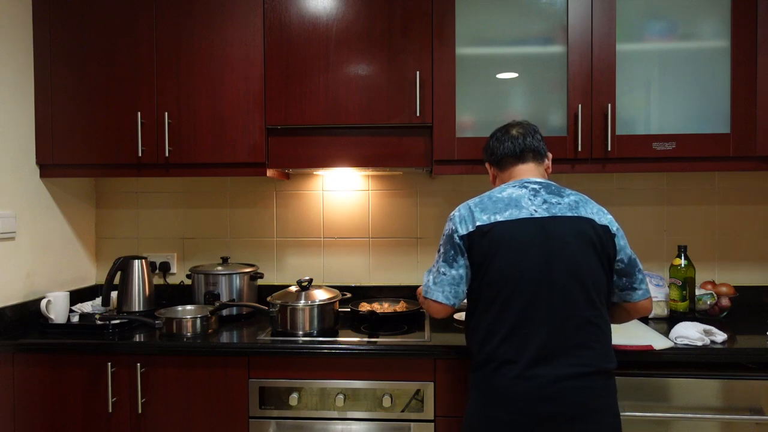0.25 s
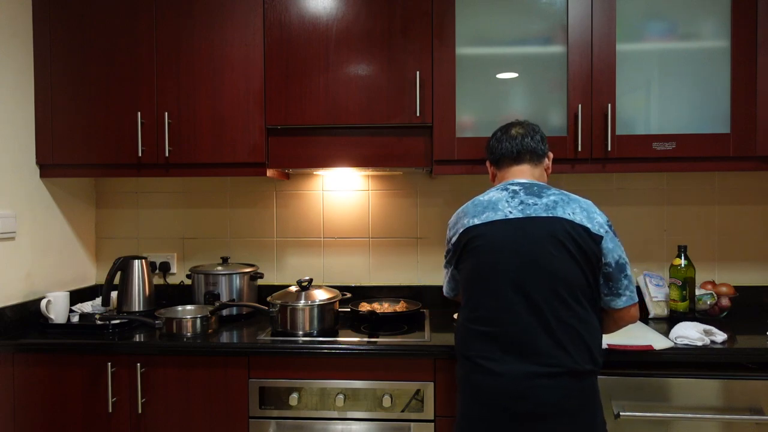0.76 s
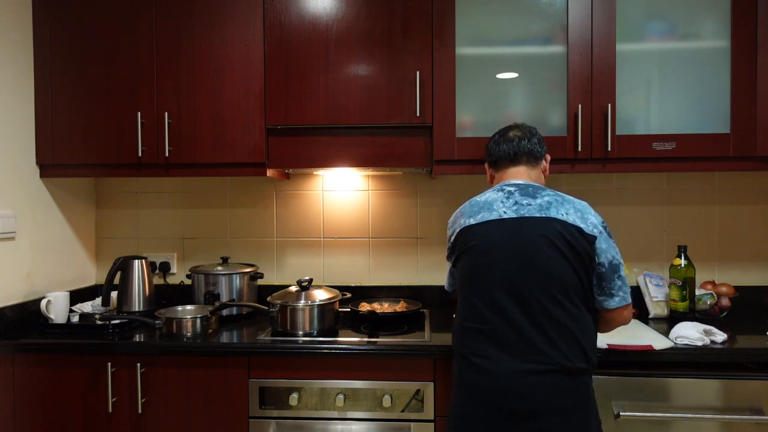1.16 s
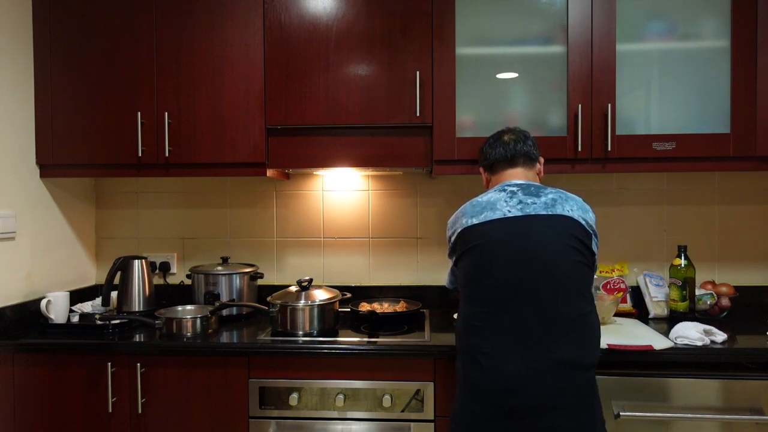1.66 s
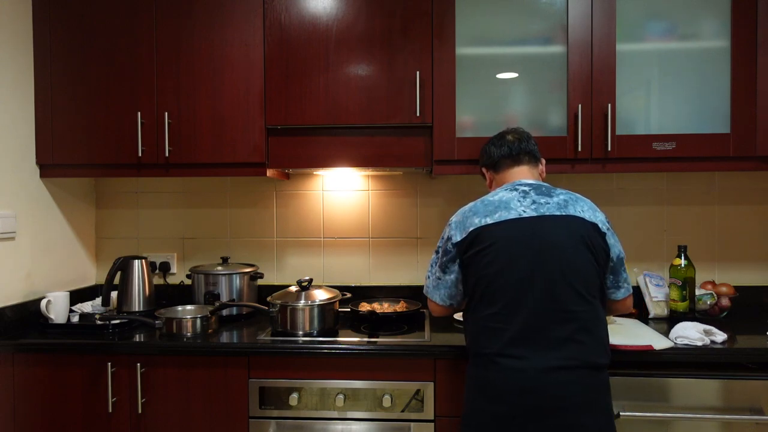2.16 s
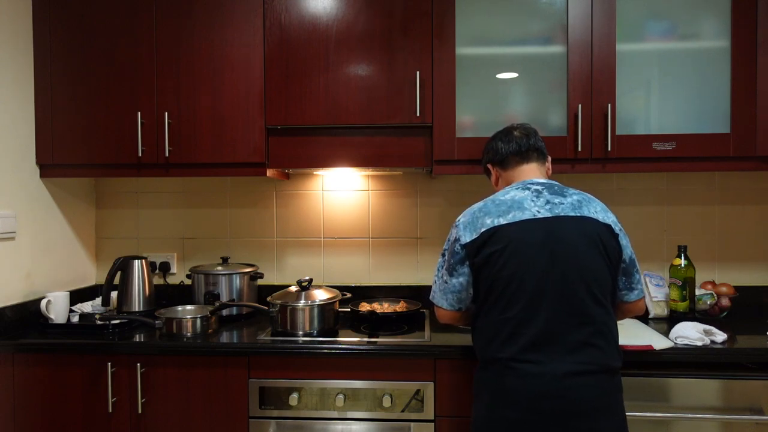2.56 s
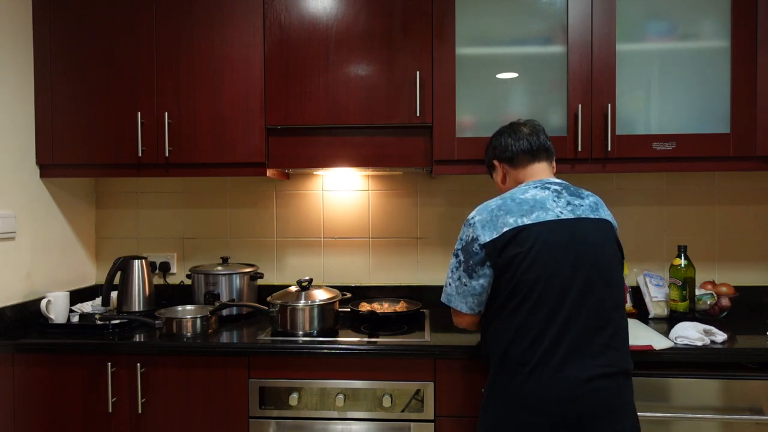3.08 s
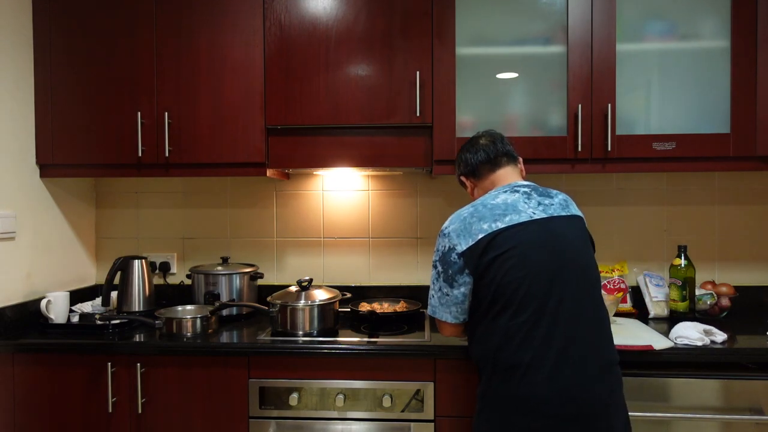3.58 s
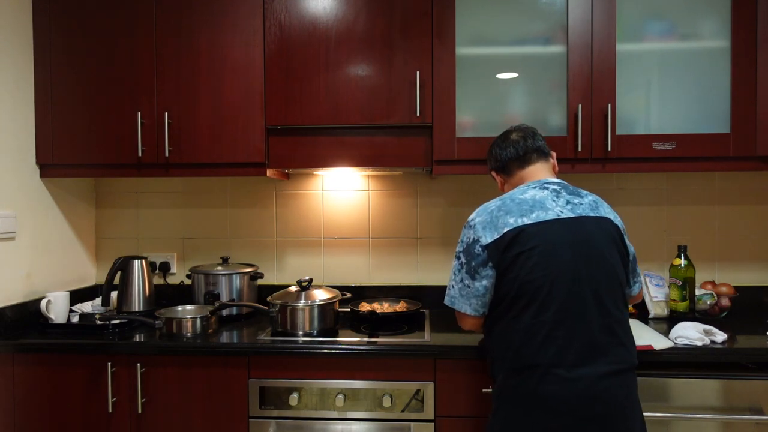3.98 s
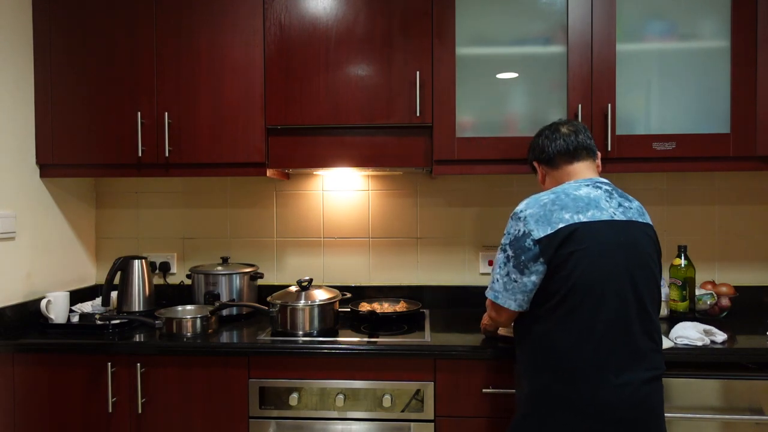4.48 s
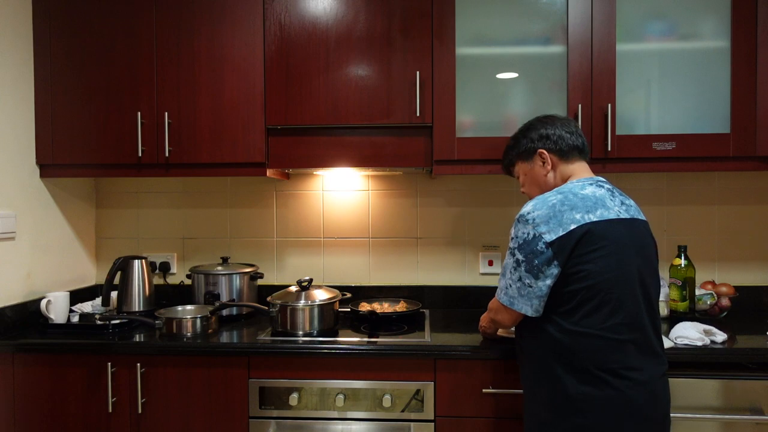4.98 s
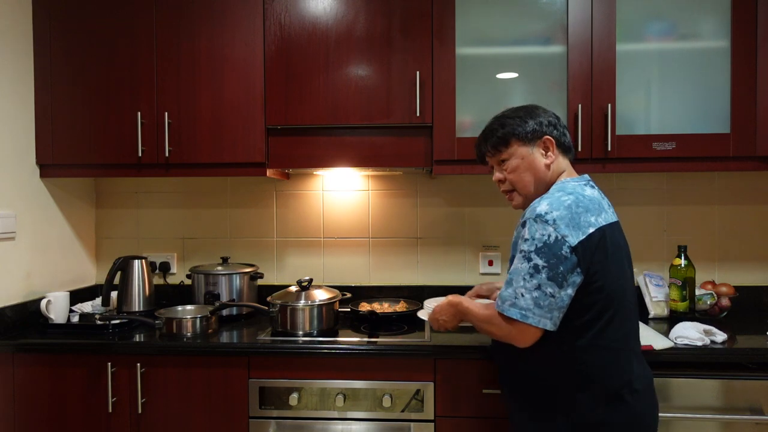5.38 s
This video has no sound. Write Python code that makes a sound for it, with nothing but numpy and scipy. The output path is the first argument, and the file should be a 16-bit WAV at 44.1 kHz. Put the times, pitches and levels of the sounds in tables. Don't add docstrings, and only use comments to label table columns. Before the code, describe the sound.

A barely audible dying metallic ring opens over very faint frying hiss, room air and low hum, with tiny fat spits around 0.5 s. At 0.73 and 0.82 s a lid is struck twice, then a pot lands hard at 0.9, is knocked at 1.0 and settles at 1.1. A pan bangs down at 1.24 and a lid claps shut at 1.33, ringing brightly. A woody-metallic knock follows at 1.73, and its echo fades. At 2.6 a jar is set down and rocks briefly, with a tap at 2.78. After faint rustle and slightly swelling sizzle near 3.1-3.3, a bowl rings high at 3.52. Sharp raps come at 4.18 and 4.3, a nudge at 4.44, and a loud set-down at 4.55. A soft dish touch at 5.03 and slight rustles near 5.55 end it. Hard-walled kitchen, short bright reverberation, loud hits held to an even level.

```python
import sys
import numpy as np
from scipy import signal
from scipy.io import wavfile
from scipy.ndimage import uniform_filter1d

SR = 44100
rng = np.random.default_rng(int(sys.argv[2]) if len(sys.argv) > 2 else 0)


def generate_wav(signal):
    frames = np.transpose(np.atleast_2d(signal))
    scaled = np.clip(frames, -1, 1) * 32767
    pcm = np.round(scaled).astype(np.int16)
    wavfile.write(sys.argv[1], SR, pcm)


def to_linear_factor(level_db):
    exponent = np.asarray(level_db, float) / 20
    return 10 ** exponent


N = 248841


def evened(x):
    return x / np.sqrt(np.mean(x ** 2) + 1e-20)


def read(points, hz):
    f, value = np.transpose(points)
    return np.interp(np.log(hz + 1), np.log(f + 1), value)


def add(mix, start_s, sound):
    part = mix[:, round(start_s * SR):][:, :sound.shape[1]]
    part += sound[:, :part.shape[1]]


# frequency_hz, side_minus_mid_db
WIDTH = [(40, -25), (250, -23), (500, -19.5), (1000, -11.5), (2000, -10), (5000, -8.5), (15000, -8.5)]


def noise(frames, mid_db, size):
    hz = np.fft.rfftfreq(size, 1 / SR)[:, None]
    t = np.arange(frames) * size / 4 / SR
    real, imaginary = rng.standard_normal((frames, len(hz), 2, 2)).T
    spectra = (real + 1j * imaginary) * to_linear_factor(mid_db(hz, t))
    spectra[1] *= to_linear_factor(read(WIDTH, hz))
    return signal.istft(spectra, nperseg=size, noverlap=size * 3 // 4)[1]


# frequency_hz, density_db_per_hz
HISS = [(1470, -30.5), (2500, -14.5), (3170, -11), (3690, -7), (5240, -8), (6490, -6.5), (15500, -10)]
# frequency_hz, density_db_per_hz
HUM = [(18, -61), (30, -17.5), (101, -22), (167, 7.5), (296, 4.5), (391, 0), (550, -43.5), (720, -44)]
# frequency_hz, density_db_per_hz
AIR = [(290, -33.5), (500, -7.5), (650, 0.5), (796, -5), (1370, -5.5), (3000, -11.5), (3900, -50.5),
       (6600, -120)]
# time_s, level_db
HISS_LEVEL = [(0, -60), (.4, -58), (.7, -59), (2.55, -58.5), (2.9, -52), (3.13, -49), (3.27, -52), (3.4, -54),
              (3.9, -56), (4.15, -61), (5.02, -47), (5.25, -53), (5.4, -52), (5.65, -59)]
CALM_DB, RUSTLE_TOP_HZ = -57.5, 11000
DUCK_S, DUCK_FROM_DB, DUCK_SHARE = 1, -25.5, 1.9


def floor(blows):
    t, frames = np.arange(N) / SR, N // 256 + 5
    grain = rng.standard_normal((frames, 513))
    grain = uniform_filter1d(grain, 12, axis=0)
    grain = uniform_filter1d(grain, 14, axis=1)
    patchy_db = 1.5 * evened(grain).T

    def coloured(colour):
        return evened(noise(frames, lambda hz, _: read(colour, hz) + patchy_db, size=1024)[:, :N])

    hiss, air, hum = coloured(HISS), coloured(AIR), coloured(HUM)
    level = to_linear_factor(np.interp(t, *np.transpose(HISS_LEVEL)) + 2.0)
    calm = np.minimum(level, to_linear_factor(CALM_DB))
    dull = signal.sosfilt(signal.butter(2, RUSTLE_TOP_HZ, fs=SR, output="sos"), hiss)
    mix = hiss * calm + dull * (level - calm)
    mix = mix + air * to_linear_factor(-68.0) + hum * to_linear_factor(-67.5)

    keep = np.exp(-1 / (DUCK_S * SR))
    heard_power = np.tanh(3 * blows[0]) ** 2 / 9
    memory_db = 10 * np.log10(signal.lfilter([1 - keep], [1, -keep], heard_power) + 1e-9)
    return mix / to_linear_factor(DUCK_SHARE * np.maximum(memory_db - DUCK_FROM_DB, 0))


RISE_S, NEAR_SIDE_DB = 0.00405, -11.5
# start_s, pitch_hz, level_db, t60_s
PINGS = [(3.519, 3389, -15, .2), (3.519, 3420, -21, 0.14), (3.574, 3406, -24.5, 0.3), (.001, 2404, -55, .5),
         (4.298, 3433, -17, .3), (4.44, 3390, -29.5, 0.46), (.897, 577, -28, .4), (.99, 857, -21, 0.47),
         (1.24, 2770, -23.5, .3), (1.332, 2920, -24, .4), (1.332, 9800, -25, 0.52), (2.784, 1413, -30, .4),
         (2.784, 1850, -27, .3), (3.519, 5226, -29, .3), (3.519, 4850, -30, .15), (3.518, 5580, -27, .25),
         (.728, 2073, -29, .4), (0.73, 1206, -30, .4), (1.332, 1370, -29, .5), (1.332, 2192, -19, .5),
         (1.332, 5260, -24, .4), (1.728, 1463, -17, .4), (1.726, 889, -23.5, .4), (1.727, 1017, -26.5, .4),
         (4.179, 3372, -6.5, 0.26), (4.178, 8126, -21, .3), (4.552, 2514, -17, .4), (5.035, 706, -39, 0.54),
         (3.32, 1340, -57, 0.46), (3.32, 5450, -55, .3), (1.332, 5370, -24, .4)]


def pings():
    mix, t = np.zeros((2, N)), np.arange(SR // 2) / SR
    rise = 1 - np.exp(-t / RISE_S)
    for start_s, pitch_hz, level_db, t60_s in PINGS:
        cycles = pitch_hz * t + [[0], [rng.random()]]
        sines = to_linear_factor([[0], [NEAR_SIDE_DB]]) * np.sin(2 * np.pi * cycles)
        add(mix, start_s, sines * rise * to_linear_factor(level_db - 60 * t / t60_s))
    return mix


# start_s, level_db
SNAPS = [(.483, -46), (0.897, -10.5), (0.989, -11), (1.094, -27), (1.241, -8.5), (1.333, -16), (2.595, -32),
         (2.783, -28), (3.437, -43), (3.521, -28), (5.034, -39)]
SNAP_T60_S, SNAP_LOW_HZ, SNAP_TOP_HZ = .07, 1800, 11500


def snaps():
    mix, t = np.zeros((2, N)), np.arange(SR // 2) / SR
    rise = np.sqrt(1 - np.exp(-t / RISE_S))
    bright = signal.butter(2, [SNAP_LOW_HZ, SNAP_TOP_HZ], "band", fs=SR, output="sos")
    for start_s, level_db in SNAPS:
        burst = signal.sosfilt(bright, rng.standard_normal((2, len(t))))
        burst = burst * to_linear_factor([[0], [NEAR_SIDE_DB]])
        add(mix, start_s, burst * rise * to_linear_factor(level_db - 60 * t / SNAP_T60_S))
    return mix


# frequency_hz, t60_s
ROOM = [(100, 0.92), (300, 0.56), (800, 0.71), (2000, 0.75), (4000, 0.76), (8000, 0.63), (15000, 0.4)]
TAIL = 44000


def kitchen():
    tail = noise(TAIL // 64 + 1, lambda hz, t: -60 * t / read(ROOM, hz), size=256)[:, :TAIL - 256]
    t = np.arange(tail.shape[1]) / SR
    build_up = 1 - np.exp(-t / 0.0033)
    near_echoes = 1 + 0.71 * np.exp(-t / 0.0047)
    tail = tail * build_up * near_echoes
    tail = tail / np.linalg.norm(tail[0])
    return tail + to_linear_factor(-30.0) * signal.unit_impulse(tail.shape, (0, 0))


def struck(modes, level_db):
    return [(hz, width, level + level_db) for hz, width, level in modes]


# frequency_hz, lift_db
RING_LIFT = [(500, 8), (2000, 7), (5000, 5.5), (10000, 6), (15000, 8.5)]
TAPS = 16384


def strike(crack, modes, ring_db):
    hz = abs(np.fft.fftfreq(TAPS, 1 / SR))
    power = to_linear_factor(2 * read(crack, hz))
    for mode_hz, width_hz, level_db in modes:
        peak = 1 / (1 + ((hz - mode_hz) / (.9 * width_hz)) ** 2)
        peak = peak * hz ** 2 / (hz ** 2 + 573.0 ** 2)
        gain = to_linear_factor(level_db + ring_db + read(RING_LIFT, mode_hz))
        power = power + (gain * peak) ** 2
    log_gain = np.log(power + 1e-9) / 2
    sound = np.fft.ifft(np.exp(np.conj(signal.hilbert(log_gain)))).real
    return sound / np.linalg.norm(sound)


# pitch_hz, width_hz, level_db
LID_MODES = [(888, 130, -12), (1210, 36, -4), (1410, 72, -22), (2075, 80, -4.5), (2940, 39, -12),
             (3470, 34, -9), (3870, 94, -9), (4230, 26, -21), (5250, 95, -10), (5650, 120, -22),
             (6890, 25, -15), (7040, 39, -12)]
# pitch_hz, width_hz, level_db
POT_MODES = [(583, 18, 5), (910, 300, -2.5), (1604, 99, 0), (2020, 29, 0), (2490, 23, 0.5), (2850, 35, -4),
             (3560, 43, -9.5), (4420, 39, -4.5), (5400, 68, -11.5), (7140, 200, -26), (7600, 170, -13.5),
             (8800, 220, -16), (11140, 60, -19), (14700, 120, -32)]
# pitch_hz, width_hz, level_db
PAN_MODES = [(870, 300, -5), (1680, 55, -0.5), (2440, 33, 2), (2780, 77, -2), (4190, 49, -9.5),
             (4960, 44, -8), (1990, 25, -6), (2160, 37, -7), (5410, 45, -11), (6150, 30, -9),
             (5880, 40, -11), (8100, 200, -15), (10300, 47, -25.5), (11600, 110, -29)]
# pitch_hz, width_hz, level_db
SHUT_MODES = [(913, 91, -5.5), (1226, 45, -3), (1384, 19, 0.5), (2170, 81, -4.5), (2900, 25, -3),
              (3220, 45, -9), (3534, 85, -6.5), (3830, 130, -6), (4425, 32, -8), (5324, 180, -7.5),
              (6960, 9.7, -5), (6850, 46, -15), (7360, 39, -14), (7700, 25, -32.5)]
# pitch_hz, width_hz, level_db
BOARD_MODES = [(867, 330, -5.5), (1462, 45, -2), (2485, 60, -6.5), (2740, 120, -10), (3345, 22, -5.5),
               (3695, 50, -7), (4850, 30, -13), (5410, 70, -12.5), (7630, 100, -15), (8000, 24, -13),
               (9600, 61, -16), (10700, 27, -15.5), (11500, 45, -16), (12200, 25, -14.5)]
# pitch_hz, width_hz, level_db
JAR_MODES = [(862, 8.6, 13), (1360, 130, 0.5), (1973, 27, 6), (2700, 53, -1), (3150, 31, 3.5),
             (3900, 41, 1), (5190, 160, -13), (6010, 150, -4.5), (7210, 100, -3), (8000, 97, -7.5),
             (8470, 57, -12.5), (8950, 390, -13), (9640, 34, -3), (11500, 96, -16)]
# pitch_hz, width_hz, level_db
SPOON_MODES = [(930, 56, -9), (1490, 96, -2), (1750, 66, -2), (2920, 46, -6), (3406, 64, -6),
               (3850, 41, -20), (5620, 100, -7.5), (7170, 43, -26)]
# pitch_hz, width_hz, level_db
BOWL_MODES = [(1645, 36, -19.5), (1840, 29, -20), (2130, 250, -18.5), (2800, 33, -23), (3390, 30, 0),
              (4850, 29, -13), (5225, 30, -5), (5570, 70, -11), (4300, 41, -24), (7120, 45, -27),
              (2970, 20, -20), (3390, 140, -11)]
# pitch_hz, width_hz, level_db
RAP_MODES = [(700, 180, -17.5), (1786, 280, -12.5), (2470, 130, -12.5), (2800, 35, -20), (3380, 85, -3),
             (3712, 37, -7), (4840, 27, -15), (5230, 70, -19), (5525, 65, -10), (5890, 37, -15),
             (6220, 30, -16), (6940, 150, -22.5), (2530, 30, -13)]
# pitch_hz, width_hz, level_db
DOWN_MODES = [(766, 167, 1), (1616, 116, 0.5), (2504, 30, 4), (3105, 34, -0.5), (3400, 87, 4),
              (3790, 260, -6), (4210, 120, -10), (4740, 40, -16), (5070, 32, -2.5), (5130, 240, -9),
              (5560, 78, -5), (5940, 59, -6), (6450, 55, -33), (7280, 85, -9.5)]
# pitch_hz, width_hz, level_db
DISH_MODES = [(706, 140, 0.5), (1650, 150, -6), (2390, 110, -2), (2820, 49, -7), (3630, 220, -7.5),
              (4070, 74, -15), (4750, 61, -20), (5350, 160, -20)]
# pitch_hz, width_hz, level_db
LID_RIM = [(8200, 56, -16), (8700, 95, -16), (9530, 120, -16.5), (10700, 35, -21), (11450, 160, -19.5),
           (12700, 50, -22), (13300, 47, -23.5), (14300, 42, -30), (15200, 60, -34), (15700, 35, -29)]
# pitch_hz, width_hz, level_db
BOWL_RIM = [(7870, 150, -15), (8150, 46, -11.5), (8500, 49, -21), (9300, 270, -24.5), (10330, 137, -14.5),
            (10760, 71, -19.5), (11300, 40, -35), (12400, 153, -25), (13260, 130, -20.5), (14600, 75, -42),
            (15800, 120, -32)]
# crack, modes, ring_db, blows, rim, rim_level_db
LID = ([(50, -38.5), (120, -37), (500, -11.5), (1200, -7.5), (4000, -12), (8000, -18.5), (12000, -35.5),
       (15500, -66)], LID_MODES, 14.4, [(.727, -3), (.815, -7.5)], LID_RIM, -8.5)
# crack, modes, ring_db, blows
POT = ([(71, -69.5), (120, -23), (496, -20), (1290, -5), (2780, 5.5), (3140, -8.5), (7830, -8),
       (15300, -18.5)], POT_MODES, 7.4, [(.896, -0.92)])
# crack, modes, ring_db, blows
POT_KNOCK = ([(71, -63), (120, -26), (477, -22.5), (572, 10.5), (1640, 0.5), (2670, -11.5), (7990, -34.5),
             (15300, -45.5)], [(577, 41, -1), (1010, 110, 0), (1610, 21, 4), (1880, 30, -16),
             (2696, 130, 0), (10800, 55, -20), (7800, 31, -27)], 17, [(.989, -5.5)])
# crack, modes, ring_db, blows
POT_SETTLE = ([(71, -75.5), (120, -64), (584, 5.5), (912, -16.5), (1430, 10), (2670, -12.5), (4350, -21.5),
              (15300, -41)], [(940, 51, 10), (1340, 26, -12), (2570, 43, -12.5), (3440, 35, -6.5),
              (4450, 60, -7.5), (5740, 34, -31)], 1.5, [(1.092, -6), (1.135, -22.5)])
# crack, modes, ring_db, blows
PAN = ([(71, -70.5), (120, -44), (494, -8.5), (1500, -2), (2800, -8.5), (5500, -12), (8500, -22.5),
       (15000, -32)], PAN_MODES, 1.1, [(1.239, 8.1)])
# crack, modes, ring_db, blows, rim, rim_level_db
LID_SHUT = ([(120, -35), (400, -10), (750, -5.5), (2200, 5), (4000, -41.5), (8000, -29.5), (12000, -36.5),
            (16000, -59.5)], SHUT_MODES, 3.5, [(1.331, 8.4)], LID_RIM, 2.6)
# crack, modes, ring_db, blows
BOARD = ([(71, -84), (170, -17), (517, -10), (912, -0.5), (2570, -5.5), (4620, -13.5), (7830, -12.5),
         (15300, -24.5)], BOARD_MODES, 1.8, [(1.726, 3)])
# crack, modes, ring_db, blows
JAR = ([(60, -66.5), (120, -27), (366, -5), (800, -9.5), (1370, -1), (2420, 0), (5440, -7), (15300, -29)],
       JAR_MODES, 1, [(2.594, -9)])
# crack, modes, ring_db, blows
JAR_ROCK = ([(200, -26), (500, -4), (1400, -5.5), (2200, -4.5), (4000, -11), (8000, -20), (13000, -33)],
            [(1376, 110, -3.5), (1620, 160, -6.5), (2040, 20, -5), (4000, 180, -11.5), (5460, 250, -15.5),
            (7170, 130, -21), (8400, 140, -19.5)], 2.7, [(2.612, -17), (2.635, -8.5), (2.665, -9),
            (2.695, -10), (2.745, -11)])
# crack, modes, ring_db, blows
JAR_TAP = ([(150, -24), (500, 0.5), (1400, -6), (3000, -5.5), (6000, -23), (12000, -26), (15500, -41)],
           [(724, 21, 1.5), (1350, 50, -11), (1928, 14, -4.5), (2260, 100, -7.5), (3160, 23, -5),
           (5240, 40, -14), (6070, 57, -11.5), (7200, 160, -23), (7860, 34, -11), (9420, 90, -19),
           (12100, 190, -28), (14900, 37, -33)], 1.4, [(2.783, -13.5)])
# crack, modes, ring_db, blows
SPOON = ([(300, -50), (940, -41), (1150, -19), (1520, -10), (3330, -11), (5630, -36), (12000, -41),
         (15600, -58)], SPOON_MODES, 5.2, [(3.433, -25)])
# crack, modes, ring_db, blows
SLIDE = ([(300, -18), (900, -4), (2200, -18), (5000, -14), (10000, -33)], [(915, 91, -5), (1250, 37, -10),
         (2140, 79, -5), (3030, 200, -14), (3860, 62, -8), (4440, 40, -14)], 2, [(4.12, -38.5)])
# crack, modes, ring_db, blows, rim, rim_level_db
BOWL = ([(200, -32), (1000, -13), (2200, 0), (4000, -3), (8000, -14), (12000, -33), (14500, -50),
        (16000, -37)], BOWL_MODES, 13.6, [(3.518, -9.5), (3.575, -20.5), (4.436, -44)], BOWL_RIM, -0.5)
# crack, modes, ring_db, blows, rim, rim_level_db
BOWL_RAP = ([(120, -35), (350, -13), (700, -2), (1800, -10), (4000, -2.5), (8000, -13), (12000, -14),
            (16000, -39.5)], RAP_MODES, 11.8, [(4.177, 0), (4.3, -13)], BOWL_RIM, 0.1)
# crack, modes, ring_db, blows, rim, rim_level_db
BOWL_DOWN = ([(120, -32), (350, -17.5), (700, -8.5), (1600, 4.5), (4000, -2.5), (8000, -7.5), (12000, -6),
             (16000, -17)], DOWN_MODES, 4.9, [(4.552, 6.9)], BOWL_RIM, 6.1)
# crack, modes, ring_db, blows
DISH = ([(150, -15), (500, -8.5), (1000, 0), (2000, 2), (4000, -1), (9000, -10), (14000, -53)],
        DISH_MODES, 12, [(5.033, -25)])
# crack, modes, ring_db, blows
LAST_RING = ([(200, -19), (600, 0), (1500, 0), (3000, -4), (6000, -16.5)], [(680, 63, 4.5), (1070, 110, -4),
             (1510, 34, -5.5), (1720, 61, -5), (2404, 26, -0.5), (2640, 27, -7), (3230, 92, -16)],
             4, [(.001, -40)])
# crack, modes, ring_db, blows
NUDGE = ([(300, -26), (700, -7), (1500, -2), (3000, -3), (7000, -16), (14000, -59)], [(710, 290, -1.5),
         (1690, 150, 0), (2510, 41, 2.5), (2800, 42, -21), (3500, 29, -10), (3860, 22, -7.5),
         (5570, 81, -22), (6220, 36, -19)], 2, [(4.437, -19.5)])
# crack, modes, ring_db, blows
THUMP = ([(30, -38), (90, -21), (165, 1.5), (300, -20.5), (600, -60)], [(170, 30, 0)], 0, [(.728, -49),
         (1.27, -31), (1.73, -35), (2.6, -52), (2.78, -39)])
# crack, modes, ring_db, blows
RUSTLE = ([(180, -22), (300, -13), (548, -29), (781, -4), (955, -1.5), (1560, 6), (12000, -8.5),
          (15600, -52)], [(1620, 180, -14), (3560, 37, 0.5), (5830, 130, -2)], 2, [(3.318, -40),
          (5.54, -41), (5.615, -39.5)])
# crack, modes, ring_db, blows
SPIT = ([(1500, -20), (3500, -9.5), (4500, 13), (6500, 0.5), (10000, 6), (15000, -35.5)],
        [(4400, 72, 0.014)], 2, [(.482, -39.5), (.59, -45)])
# start_s, strength_db
TICK_TIMES = [
    (.894, -15),
    (.989, -9),
    (1.092, -19),
    (1.238, -11),
    (1.331, -12),
    (2.783, -28),
    (3.517, -27),
    (5.034, -41),
]
# crack, modes, ring_db, blows
TICK = ([(500, -31), (2000, 14), (6000, 3.5), (12000, -3), (16000, -12)], [(7850, 200, 0.022)],
        -1, TICK_TIMES)
# crack, modes, ring_db, blows
THUD = ([(80, -43), (200, -18.5), (700, -31), (1500, -51)], [(412, 65, 0.0016)], 0, [(.899, -19),
        (.993, -20), (1.092, -21.5), (2.594, -45)])
OBJECTS = [LID, POT, POT_KNOCK, POT_SETTLE, PAN, LID_SHUT, BOARD, JAR, JAR_ROCK, JAR_TAP, SPOON,
           SLIDE, BOWL, BOWL_RAP, BOWL_DOWN, LAST_RING, DISH, NUDGE, RUSTLE, SPIT, TICK, THUMP, THUD]
SPOTS = 11


def clanks():
    mix, count = np.zeros((2, N)), 0
    paths = [kitchen() for _ in range(SPOTS)]
    for crack, modes, ring_db, blows, *rim in OBJECTS:
        rim_modes = struck(*rim) if rim else []
        sound = strike(crack, modes + rim_modes, ring_db)[None]
        for start_s, strength_db in blows:
            in_room = signal.fftconvolve(sound, paths[count % SPOTS], axes=1)
            add(mix, start_s, to_linear_factor(strength_db + 20.5) * in_room)
            count += 1
    return mix


def scene():
    blows = clanks()
    band = signal.ellip(10, .5, 70, 16050, fs=SR, output="sos")
    mid, side = signal.sosfilt(band, blows + floor(blows) + pings() + snaps())
    return np.array([mid + side, mid - side])


def band_limit(x):
    return signal.sosfilt(signal.butter(12, 16650, fs=SR, output="sos"), x)


def record(dry):
    power_db = 10 * np.log10(abs(uniform_filter1d((dry ** 2).mean(0), 130)) + 1e-12)
    fall_db = np.arange(N) * 300. / SR
    held_db = np.maximum.accumulate(power_db + fall_db) - fall_db
    over_db = np.maximum(held_db + 17.0, 0)
    ahead_db = uniform_filter1d(over_db, size=200, origin=-90)
    flattened = dry / to_linear_factor(0.86 * ahead_db)
    rumble_cut = signal.butter(2, 60, "high", fs=SR, output="sos")
    return band_limit(signal.sosfilt(rumble_cut, flattened))


dry = scene()
out = record(dry)
generate_wav(out)
```